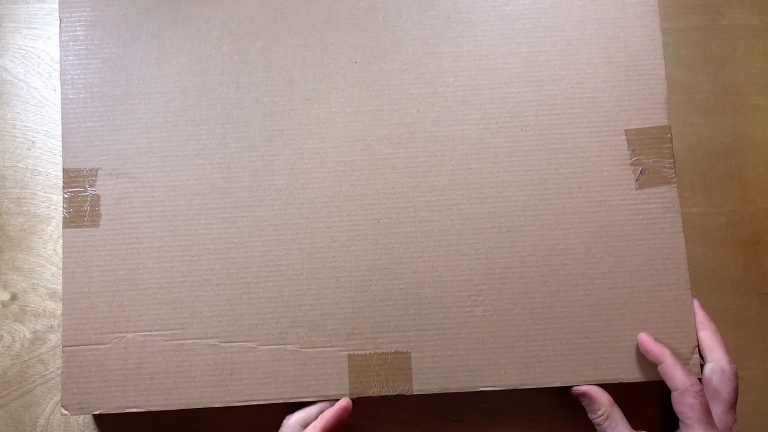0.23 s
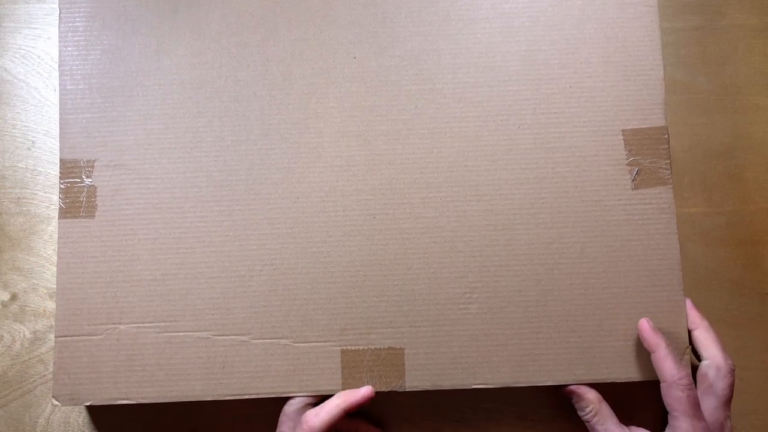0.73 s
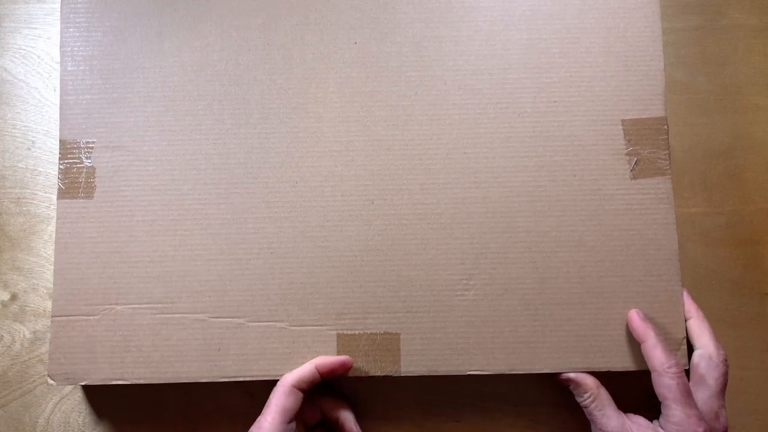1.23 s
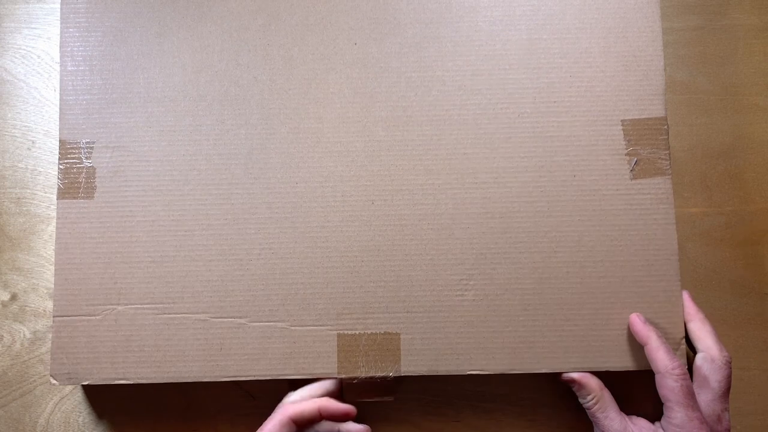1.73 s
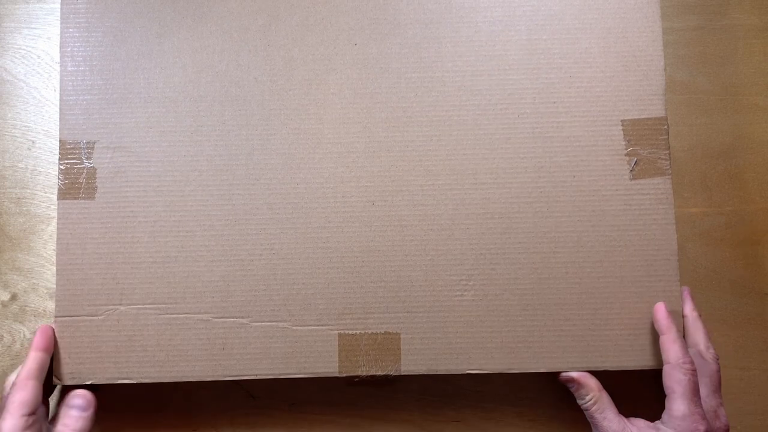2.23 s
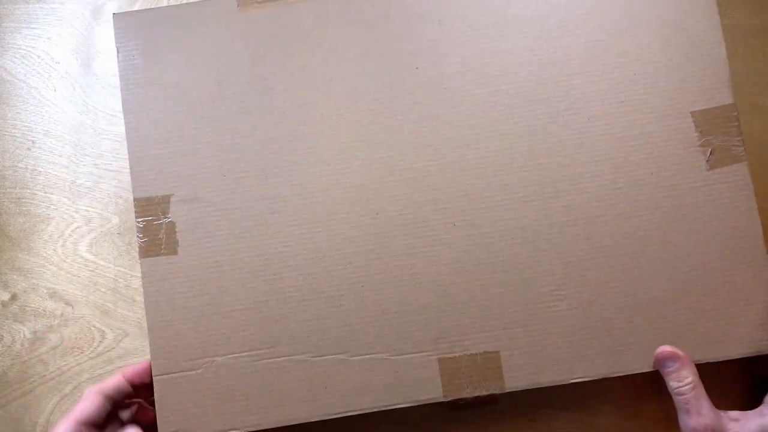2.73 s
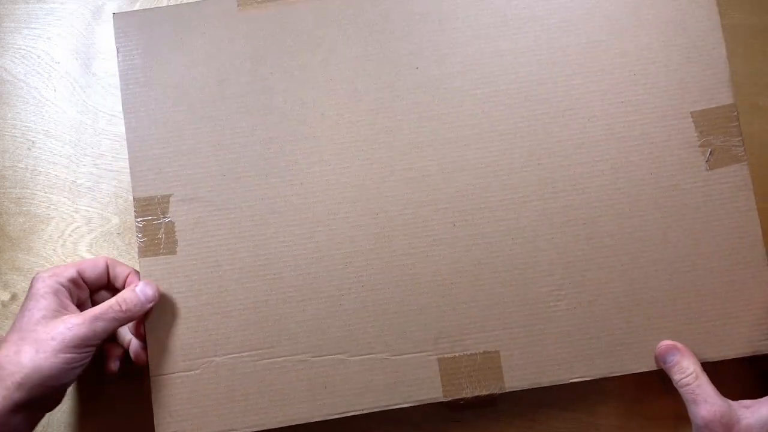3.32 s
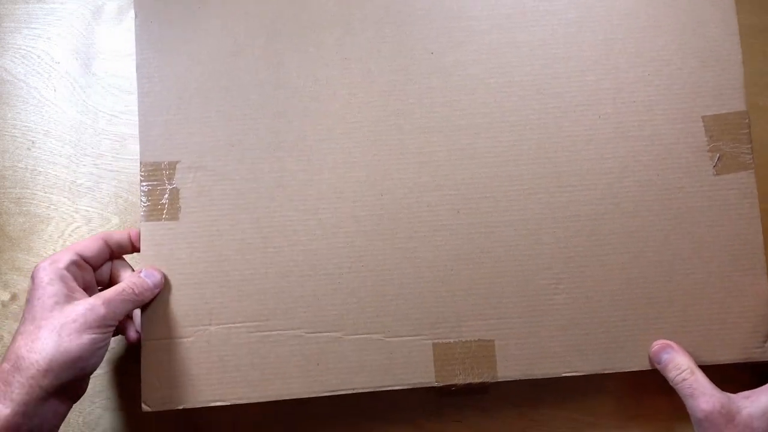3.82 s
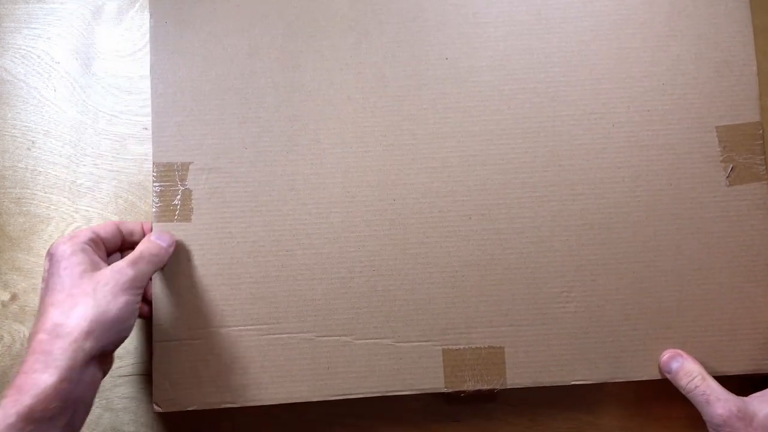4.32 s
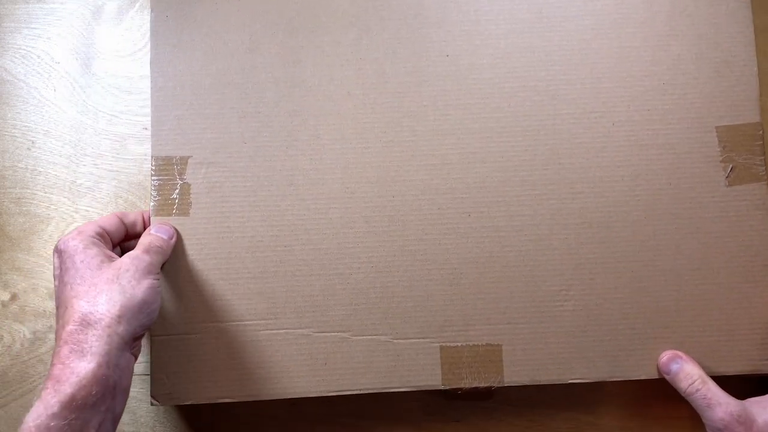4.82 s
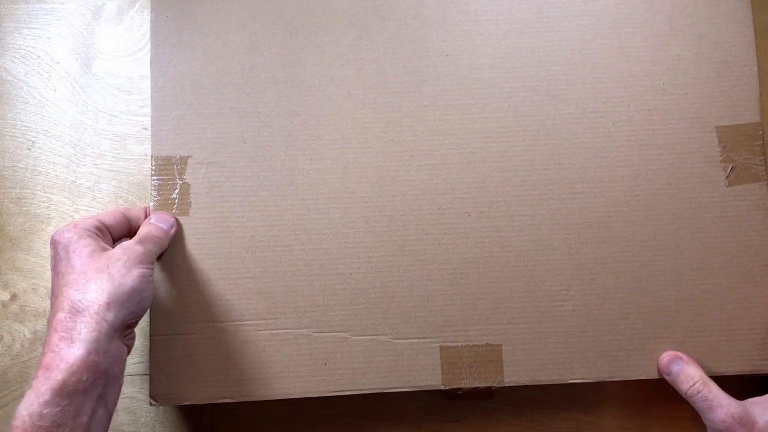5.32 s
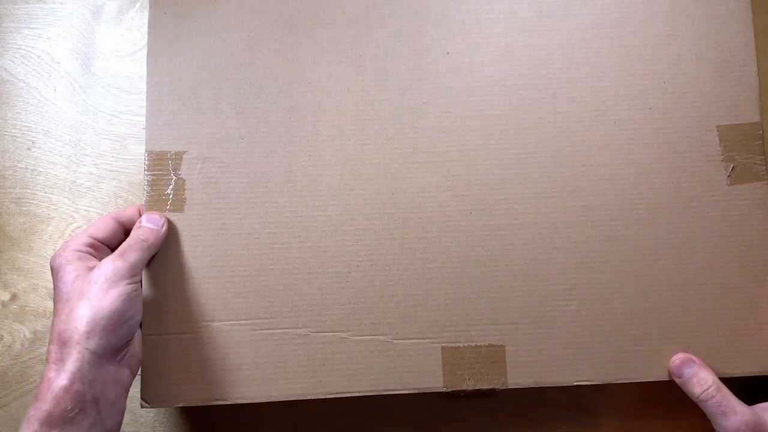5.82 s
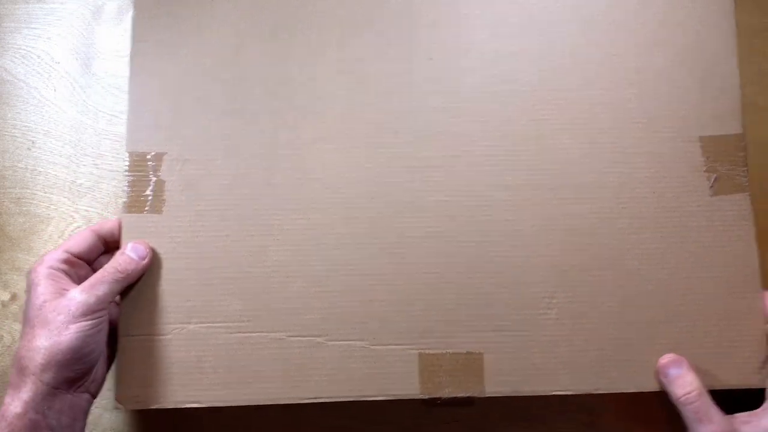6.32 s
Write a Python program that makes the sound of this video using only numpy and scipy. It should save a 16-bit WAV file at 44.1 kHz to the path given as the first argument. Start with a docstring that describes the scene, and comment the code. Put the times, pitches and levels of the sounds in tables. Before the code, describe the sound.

Hands turn a large cardboard box on a wooden table, rubbing, snapping and creaking, with one sharp knock in a quiet room.

```python
"""Hands turn a large cardboard box on a wooden table in a small, quiet room. First the board rubs and snaps
as it sticks and slips, and the front flap creaks against its tape. At 1.3 s a flap lets go with a sharp
knock. Softer rubbing and picking at the taped edge follow, with faint squeaks and fingers thumping the
panel. From 4.4 s the snaps grow louder, then the side flap creaks, and a few thumps and a last rub end it.
A soft hush and hum lie under everything."""
import sys
import numpy as np
from scipy import signal
from scipy.fft import rfft, irfft
from scipy.io import wavfile
from scipy.ndimage import uniform_filter1d

SR = 44100
rng = np.random.default_rng(int(sys.argv[2]) if len(sys.argv) > 2 else 0)


def to_wav(s):
    """Save 16-bit WAV."""
    ch = np.atleast_2d(s).T  # columns
    pcm = np.round(np.clip(ch, -1, 1) * 32767)  # PCM
    wavfile.write(sys.argv[1], SR, pcm.astype(np.int16))


N = 288855
T = np.arange(N) / SR

# how strong cracking cardboard is from bass to treble: pitch_hz, level_db
CRACK_TONE = [(59, -49), (100, -34), (1130, -15.5), (1870, -6), (2580, -6), (3250, -4), (5900, -14.5),
              (6560, -12), (7290, -14.5), (8460, -20), (16000, -55.5)]


def snaps():
    """The board sticks, then slips: a click, a tiny burst, an echo off the table and a ringing edge."""
    # one snap a row; low, high and top are set against its middle part:
    # start_s, level_db, ring_hz, low_db, high_db, high_hz, top_db
    single_snaps = [(.0074, -26, 1340, -19, -3, 5500, -19), (.0147, -27, 1370, -30, -3, 5430, -25),
                    (.0254, -26, 2570, -23, -18, 4920, -28), (.0376, -35, 1240, -18, -10, 5500, -28),
                    (.0301, -23.5, 1360, -14, -11, 4730, -22), (.0552, -24, 1820, -34, -14, 5180, -25),
                    (.098, -21.5, 2290, -7.5, -16.5, 5600, -39),
                    (.2383, -33.5, 2280, -2.5, -2.5, 4700, -20), (.424, -33.5, 1390, -9, -11.5, 4040, -25),
                    (.6818, -41, 1550, -1, -14, 4860, -31), (.7317, -40, 2050, -6, -22, 4520, -38),
                    (1.006, -47.5, 1510, 3, -14, 4500, -30), (1.041, -51, 3800, -20, 4, 7500, 2),
                    (1.052, -37.5, 3700, -25, -2, 6030, -10), (1.218, -52, 2120, -6, -27, 4270, -59),
                    (1.2322, -38.5, 2240, -18, -35, 4320, -43), (1.2526, -46, 2060, -3, -18, 4000, -25),
                    (1.533, -50, 1320, -15, 0, 4240, -28), (1.5875, -40, 1880, -29, -16, 4030, -31.5),
                    (1.6023, -48, 1430, -19, 2, 5700, -15), (1.8536, -24.5, 3280, -4.5, -23.5, 4150, -14),
                    (1.8644, -32, 2540, -28, -12.5, 7500, -30), (1.8774, -57.5, 1790, -2.5, 3, 7300, -14),
                    (2.1713, -55, 1986, -25.5, 9.5, 4800, -26), (2.184, -40.5, 2010, -4, -8.5, 4050, -36.5),
                    (2.2867, -41, 3900, -6, 12, 6860, 4.5), (2.3016, -38.5, 4250, -2, 13, 7200, 4),
                    (2.676, -35.5, 3680, -9, 9.5, 7800, -5), (2.7512, -45, 2460, -11, 8, 7000, -8),
                    (2.7724, -48, 3670, -15, 11, 6600, 4), (2.8261, -45.5, 1850, -24, 3.5, 7560, -10),
                    (2.8494, -52.5, 1840, -17.5, 7, 5000, -25), (2.9078, -40.5, 1670, -33, 4.5, 4500, -8.5),
                    (3.0767, -45.5, 3730, -7, 12, 4800, 1.5), (3.3154, -57.5, 1884, -6.5, 1.5, 7180, -25),
                    (3.3314, -61, 1333, -9.5, 4, 7230, -26.5), (3.3967, -39.5, 1760, -15.5, 2, 4330, -36),
                    (3.421, -26, 3730, -11.5, 2, 4300, -31.5), (3.5864, -50.5, 2030, -11, 8.5, 7600, -12),
                    (3.8732, -29.5, 1650, -18.5, -4, 4600, -47), (4.386, -27, 2190, -21, -15.5, 4310, -43),
                    (4.3944, -37, 2130, -22, -20, 4530, -39), (4.4087, -34.5, 1380, -5, -9, 5510, -40),
                    (4.5195, -12.5, 3380, -24, -19, 4280, -50), (4.5325, -33, 2490, -2, -19, 4230, -40),
                    (4.563, -16, 2600, -24.5, -15.5, 4300, -57), (4.5774, -30, 2470, -15, -17, 4540, -40),
                    (4.6614, -33, 1810, -19, -10, 5120, -23), (4.6666, -28, 3270, -23, -17, 4060, -33),
                    (4.6769, -25.5, 1850, -11, -17, 4000, -26), (4.6834, -25, 1870, -16.5, -22, 4070, -33),
                    (4.6984, -24.5, 1910, -15, -18, 4010, -28), (4.7122, -19.5, 3030, -14, -8.5, 4300, -33),
                    (4.7345, -19.5, 3170, -16, -12, 4300, -31), (4.8033, -17, 2000, -15, -16.5, 4180, -29),
                    (5.0835, -37, 2050, -11.5, -2, 5030, -9.5),
                    (5.3283, -21.5, 1830, -22, -26, 4060, -41.5),
                    (5.3347, -25.5, 1700, -18, -14, 5200, -37), (5.3434, -19.5, 1820, -16, -19, 5120, -45),
                    (5.365, -19.5, 1680, -30, -10, 4380, -41), (5.3685, -17.5, 3140, -26, -14, 4040, -35),
                    (5.3951, -19, 1840, -37, -16, 5090, -39), (5.41, -20, 1820, -29, -12, 4050, -43),
                    (5.433, -17.5, 1690, -17, -15, 4530, -40), (5.449, -28, 1850, -31, -21, 4010, -41),
                    (5.4608, -29, 1720, -30, -5.5, 4020, -42), (5.4724, -25, 1680, -18, -14, 4330, -39),
                    (5.5062, -25.5, 1720, -8, -11, 4230, -38), (5.5493, -27, 1690, -8, -21, 4010, -37),
                    (5.7114, -42, 1760, -18, -8, 5540, -5), (5.73, -40, 1830, -18, -6, 6000, -11),
                    (5.9546, -18.5, 1610, -14, -8.5, 4080, -30.5), (5.9878, -33, 1500, -3, -19, 4000, -44),
                    (6.2129, -40.5, 3230, -29, 8, 6200, -5)]
    rows = single_snaps + flurries()
    out, t = np.zeros(N), np.arange(2048) / SR
    lead_s = .002
    age = np.maximum(t - lead_s, 0)
    click = np.exp(-((t - .0023) / .00002) ** 2)
    fade_in = np.clip((t - .0014) / .00051, 0, 1)
    for start_s, level_db, ring_hz, low_db, high_db, high_hz, top_db in rows:
        noise = rng.standard_normal(len(t))
        decay_s = .001221 * np.exp(.2 * noise[0])
        shape = (1 - np.exp(-age / .00027)) * np.exp(-age / decay_s)
        burst = 1.5 * click + noise * shape
        echo = .37 * np.roll(burst, round(.0032 * SR))
        low, mid, high, top = board_bands(burst + echo, CRACK_TONE, ring_strength=7.5)
        high = unit_level(.45 * high + resonate(high + .32 * mid, high_hz, width_hz=1100))
        # the ring sags in pitch as the bent edge relaxes
        cycles = ring_hz * (.933 * age + .00022 * (1 - np.exp(-age / .0011)))
        ring = unit_level(shape * np.sin(2 * np.pi * cycles))
        ring_share = .55 * (ring_hz / 1800) ** -.8  # higher rings are weaker
        middle = (1 - ring_share) * mid + ring_share * ring
        snap = middle + gain(low_db) * low + gain(high_db) * high + gain(top_db) * top
        add(out, start_s - lead_s, gain(level_db) * snap * fade_in / abs(middle).max())
    return out


def flurries(count=4):
    """Makes rows for small extra snaps that come in quick bunches at chance moments."""
    # one bunch a row: start_s, length_s, level_db, ring_hz
    bunches = [(.166, .05, -36, 2100), (.25, 0.2, -35, 1900), (5.476, .2, -34, 1750),
               (5.952, 0.032, -38, 1880)]
    tone = (-17, -12, 5200, -33)  # low_db, high_db, high_hz, top_db
    rows = []
    for start_s, length_s, level_db, ring_hz in bunches:
        for k, (when, force, pitch) in enumerate(rng.random((count, 3))):
            snap_s = start_s + length_s * (k + when) / count
            rows.append((snap_s, level_db + 8 * (2 * force - 1), ring_hz * (.87 + .33 * pitch), *tone))
    return rows


def knock():
    """The tape crackles for a moment, then the flap lets go and rings very briefly."""
    # the flap's own notes: pitch_hz, level_db, fade_s (time to fall 60 dB)
    flap_notes = [(102.4, -25.5, .03), (270, -21, 0.034), (419, -21, 0.0209), (972, -31.5, 0.0032),
                  (1236, -5, 0.0084), (1416, 4, 0.011), (2293, -0.5, 0.0088), (2670, -7.5, 0.01),
                  (3390, -7, 0.012), (4070, -21, 0.015), (6150, -15, 0.012), (7270, -24, 0.0077)]
    knock_s, lead_s = 1.2937, .01
    out, t = np.zeros(N), np.arange(4096) / SR - lead_s
    age = np.maximum(t, 0)
    ring = np.zeros(len(t))
    for hz, level_db, fade_s in flap_notes:
        rise = 1 - np.exp(-(age * hz / 1.27) ** 2)  # stiff high notes speak first
        ring += gain(level_db - 60 * age / fade_s) * rise * np.sin(2 * np.pi * hz * age)
    crackle = gain(-19) * np.clip(1 + t / .0042, 0, 1) ** .5 * (t < 0)
    crack = gain(-9) * np.exp(-age / .0032) * (t > 0)
    noise = rng.standard_normal(len(t)) * (crackle + crack)
    fibres = irfft(rfft(noise) * unit_level(tone_gains(CRACK_TONE, len(t))))
    add(out, knock_s - lead_s, gain(4.5) * ring + fibres)
    return out


def rubbing():
    """Hands and table drag over paper fibres, whose countless tiny clicks blend into a scrape."""
    # how strong rubbed paper is from bass to treble: pitch_hz, level_db
    paper_tone = [(59, -52.5), (100, -21), (119, -0.5), (156, -5.5), (289, -0.5), (452, -3), (547, -4.5),
                  (950, -5), (1760, -0.5), (3050, -2.5), (5770, -7), (10200, -19.5), (16000, -45)]
    scrape, rumble, hiss, fizz, edge_hz, edge_db = hand_pressure()
    clumps = unit_level(uniform_filter1d(rng.standard_normal(N), size=250))
    noise = rng.standard_normal(N)
    click_db = 2.1 * np.minimum(rng.exponential(1, N), 4)
    fibres = noise * gain(.31 * clumps + click_db)
    low, mid, high, top = board_bands(fibres, paper_tone, ring_strength=.7)
    edge_ring = unit_level(resonate(resonate(fibres, edge_hz, 280), edge_hz, 400))
    return scrape * (mid + gain(edge_db) * edge_ring) + rumble * low + hiss * high + fizz * top


def hand_pressure():
    """Strokes swell, hold and fade. Gives four rubbing levels and the edge's ring pitch and level."""
    # strokes of hands and table on the board: full_pressure_s, rise_s, hold_s, release_s,
    # scrape_db, rumble_db, hiss_db, fizz_db, edge_hz, edge_db (set against the scrape)
    strokes = [(.012, 0.09, 0.013, 0.18, -41.5, -41.5, -56, -59, 1400, 0),
               (0.104, 0.014, 0.0085, 0.055, -38.5, -39.5, -52, -75, 1800, -14),
               (0.241, 0.29, 0.094, 0.18, -43, -47, -55, -70, 1600, -28),
               (0.466, 0.011, 0.058, 0.09, -59.5, -54.5, -72, -90, 1660, -24),
               (0.565, .05, .13, .3, -57.5, -67.5, -65.5, -79, 1950, -17),
               (0.731, 0.071, 0.058, 0.51, -57, -60, -66, -83, 2050, -7),
               (1.024, 0.37, 0.0053, 0.057, -57.5, -62.5, -62, -73, 1970, -22),
               (1.056, 0.023, .004, 0.13, -64.5, -59, -59.5, -79, 2000, -16),
               (1.288, 0.04, 0.0047, 0.012, -42, -47, -50, -71, 1790, -7),
               (1.317, 0.036, 0.023, .15, -37, -45, -42.5, -56.5, 1420, -8),
               (1.428, .06, .004, 0.21, -50, -73, -60, -74, 1290, -1),
               (1.745, 0.11, .03, .1, -55.5, -62, -64.5, -80, 1900, -11),
               (1.588, 0.071, .004, 0.034, -58.5, -63, -73, -79, 1760, -6.5),
               (1.839, 0.19, .006, 0.019, -49.5, -53, -56, -68, 2690, -4),
               (1.902, 0.046, 0.019, 0.39, -66, -59, -66, -79.5, 1700, -22),
               (2.18, 0.011, .004, 0.11, -58.5, -55, -57.5, -73, 2000, -19.5),
               (2.358, 0.18, 0.11, .3, -52, -58.5, -53.5, -66, 2015, -19),
               (2.543, 0.39, .03, 0.45, -51, -58, -56, -70, 1900, -17),
               (2.748, 0.089, 0.016, 0.33, -58.5, -59, -57.5, -69, 1850, -13),
               (2.896, .01, 0.0043, 0.29, -58, -66, -64, -74, 1810, -12),
               (3.077, 0.0053, .004, .04, -55, -63.5, -61.5, -69.5, 1510, -0.5),
               (3.13, .08, .004, 0.26, -60, -63, -65, -75.5, 1900, -4.5),
               (3.395, .01, 0.056, 0.45, -55, -60.5, -62.5, -79.5, 1700, -32),
               (3.423, .005, .03, .12, -49.5, -60, -62, -84, 2900, 1),
               (3.586, 0.22, 0.024, 0.75, -55, -60.5, -60, -72, 1900, -19),
               (3.868, .02, 0.12, 0.25, -56.5, -58, -63, -77, 1815, -17),
               (4.069, .05, .004, 0.052, -56, -62, -62, -69, 1730, -10),
               (4.106, .04, .05, .15, -55, -58.5, -58.5, -73, 1800, -11),
               (4.22, 0.095, .02, 0.43, -57.5, -64, -63.5, -81, 2147, -8),
               (4.418, 0.072, 0.01, 0.098, -46.5, -51.5, -55.5, -76, 1800, -15),
               (4.519, 0.0068, 0.0046, 0.18, -52, -51, -62, -67, 1950, -17),
               (4.707, 0.16, .004, 0.18, -48.5, -47.5, -52.5, -83, 1950, -3),
               (4.8, 0.0046, .004, 0.18, -45.5, -49.5, -52, -88, 1880, -14),
               (4.959, 0.047, 0.0048, 0.14, -51.5, -60.5, -56.5, -62.5, 1910, -18),
               (5.07, .01, .004, 0.21, -62, -56.5, -64, -73, 2000, -10),
               (5.211, 0.14, .004, 0.098, -57, -72, -58, -71, 1790, -8.5),
               (5.284, 0.027, .004, .04, -63.5, -73, -67, -70, 1675, -12),
               (5.329, 0.0075, 0.15, 0.26, -48.5, -48, -52, -76, 1810, -12),
               (5.528, 0.15, 0.074, 0.16, -38, -45, -46.5, -69, 1750, -32),
               (5.683, 0.14, 0.032, 0.058, -47, -65, -53, -57, 1790, 0),
               (5.76, .03, .004, 0.36, -56, -55.5, -58.5, -70.5, 1810, -3),
               (5.957, .004, 0.0067, .2, -42, -53.5, -47, -80, 1650, -25),
               (6.164, .04, 0.0037, 0.064, -58.5, -78, -66, -72, 2050, -10),
               (6.213, .006, 0.11, 0.53, -57.5, -60, -71, -82, 1900, -10),
               (6.461, 0.51, .2, .1, -47, -54, -50, -61, 1850, -24)]
    # hands lying on the board: scrape_db, rumble_db, hiss_db, fizz_db, edge_hz, edge_db
    resting = (-83, -68, -78, -97.5, 1799.5, -13)
    # how strongly each part follows the pressure (plain factors): scrape, rumble, hiss, fizz
    steepness = (1.004, 1.01, 1.01, 1.7)
    t = np.arange(0, T[-1] + .002, .001)
    full_s, rise_s, hold_s, release_s, *columns = np.transpose(strokes)[:, :, None]
    before = np.maximum(full_s - t, 0) / rise_s
    after = np.maximum(t - full_s - hold_s, 0) / release_s
    pressure_db = -24 * (before + after)
    powers = [np.vstack([gain(db + steep * pressure_db), np.full(len(t), gain(rest_db))]) ** 2
              for db, rest_db, steep in zip(columns, resting, steepness)]
    levels = [np.sqrt(power.sum(0)) for power in powers]
    share = powers[0] / powers[0].sum(0)  # the loudest scrape has most say in the edge's ring
    edge = [np.append(column, rest) @ share for column, rest in zip(columns[4:], resting[4:])]
    return [np.interp(T, t, curve) for curve in levels + edge]


def creaks():
    """A flap pulled against its tape slips unevenly; each slip is a puff of noise that makes it ring."""
    # one list of points for each creak: time_s, level_db, slips_per_s
    pulls = [
        [(0.0, -42, 133), (0.024, -32, 118), (0.092, -51, 154), (0.098, -41, 125), (0.12, -38, 220)],
        [(0.15, -50, 104), (0.294, -32, 127), (0.418, -69, 280), (0.42, -47, 103)],
        [(5.44, -29, 110), (5.462, -30, 143), (5.486, -36, 180), (5.554, -37.5, 130), (5.6, -40, 170)],
        [(5.605, -46, 170), (5.631, -34, 130), (5.655, -27.5, 116), (5.76, -49.5, 99)],
    ]
    # the notes each flap rings at: pitch_hz, width_hz, level_db
    front_flap = [(253, 27, -10.0), (1333, 14, 3), (1790, 28, -1.5), (2146, 24, 0.5), (2740, 43, -6),
                  (2760, 25, -12), (3160, 26, -4), (4040, 36, -5.5), (4650, 100, -10.0), (4850, 22, -5.5),
                  (4960, 37, -21), (5270, 54, -7), (5960, 130, -8.5), (6900, 52, -22), (10600, 550, -34),
                  (12900, 600, -33)]
    side_flap = [(310, 51, -12), (685, 23, -7), (1764, 85, 7), (2110, 40, -3), (2470, 26, -34),
                 (3350, 200, -3), (3940, 59, -6.5), (5040, 190, -17), (5460, 110, -13), (6060, 30, -22),
                 (6330, 75, -15), (6850, 69, -28), (8100, 49, -18), (9350, 160, -27)]
    out = np.zeros(N)
    for points, flap in zip(pulls, (front_flap, front_flap, side_flap, side_flap)):
        time_s, level_db, slips_per_s = np.transpose(points)
        t = np.arange(time_s[0], time_s[-1], 1 / SR)
        wander = unit_level(uniform_filter1d(rng.standard_normal(len(t)), size=200))
        slips = np.cumsum(np.interp(t, time_s, slips_per_s) * np.exp(.3 * wander)) / SR
        puffs = rng.standard_normal(len(t)) * (.23 + np.exp(-(slips % 1) / .088))
        # a second, wider pass keeps the gaps between the notes quiet
        ring = sum(gain(db) * resonate(resonate(puffs, hz, width + 45), hz, 2.1 * width + 300)
                   for hz, width, db in flap)
        loudness = gain(np.interp(t, time_s, level_db)) * signal.windows.tukey(len(t), .1)
        add(out, time_s[0], loudness * unit_level(ring))
    return out


def thumps():
    """A soft fingertip sets the panel swinging: a short low note with two higher ones on top."""
    # one finger tap a row: start_s, level_db, pitch_hz, fade_s (time to fall 60 dB)
    finger_taps = [(0.098, -45, 285, 0.04), (0.465, -41, 816, 0.031), (0.502, -40.5, 880, 0.043),
                   (1.737, -47, 374, 0.19), (1.854, -20, 564, 0.014), (1.871, -36, 276, 0.045),
                   (5.714, -28.5, 510, 0.024), (6.128, -26.5, 260, 0.023), (6.161, -23.5, 261, 0.036),
                   (6.312, -40, 276, 0.1)]
    out, t = np.zeros(N), np.arange(4000) / SR
    rise = 1 - np.exp(-t / .00048)
    for start_s, level_db, hz, fade_s in finger_taps:
        fall = gain(-60 * t / fade_s)
        note = np.sin(2 * np.pi * hz * t)
        overtone = .41 * fall * np.sin(2 * np.pi * 2.28 * hz * t)
        tick = .52 * fall ** 3 * np.sin(2 * np.pi * 2100 * t)
        add(out, start_s, gain(level_db) * rise * fall * (note + overtone + tick))
    return out


def squeaks():
    """Faint, thin tones that slide in pitch; the lower ones are raspier."""
    # one list of points for each squeak: time_s, pitch_hz, level_db
    slides = [
        [(0.53, 5220, -77), (0.548, 5640, -65), (0.572, 5600, -53.5), (0.59, 5850, -79)],
        [(1.93, 5199, -72), (1.948, 5400, -61), (1.972, 5516, -73), (2.02, 5449, -62.5), (2.12, 5110, -84)],
        [(1.92, 10293, -83), (1.932, 10514, -85), (2.004, 10100, -83), (2.054, 10625, -86), (2.07, 9300, -97)],
        [(4.44, 8922, -93), (4.442, 8850, -86), (4.584, 9000, -71), (4.622, 9500, -72), (4.64, 9601, -87)],
    ]
    out = np.zeros(N)
    for points in slides:
        time_s, pitch_hz, level_db = np.transpose(points)
        t = np.arange(time_s[0], time_s[-1], 1 / SR)
        slide_hz = np.interp(t, time_s, pitch_hz)
        tone = np.sin(2 * np.pi * np.cumsum(slide_hz) / SR)
        rasp = unit_level(resonate(rng.standard_normal(len(t)), slide_hz, width_hz=300))
        rasp *= .79 * (5500 / pitch_hz.mean()) ** 3
        loudness = gain(np.interp(t, time_s, level_db)) * signal.windows.tukey(len(t), .3)
        add(out, time_s[0], loudness * unit_level(tone + rasp))
    return out


def board_bands(sound, tone, ring_strength):
    """The board boosts its own notes. Gives low, middle, high and top parts of equal power."""
    # the notes the board rings at: pitch_hz, width_hz, level_db
    board_notes = [(244, 120, -3.5), (710, 140, -9.5), (1670, 1300, -7), (2340, 160, -6), (2930, 32, -0.5),
                   (3320, 120, -4.5), (4363, 77, -1.5), (5840, 330, -6.5), (5880, 20, -11.5),
                   (7290, 69, -24.5)]
    hz = np.fft.rfftfreq(len(sound), 1 / SR)
    above = [1 / (1 + (split_hz / (hz + 1)) ** 8) for split_hz in (1050, 4250, 8750)]
    boost = sum(gain(db) / (1 + (2 * (hz - pitch) / width) ** 2) for pitch, width, db in board_notes)
    boost *= 1 + .97 * (1 - above[0])  # the wide panel rings more clearly than the edges
    spectrum = rfft(sound) * tone_gains(tone, len(sound)) * np.sqrt(1 + ring_strength * boost)
    bands = -np.diff([np.ones_like(hz), *above, np.zeros_like(hz)], axis=0)
    return [unit_level(irfft(spectrum * band, len(sound))) for band in bands]


def room_echo(sound):
    """The walls send back many small echoes, each pitch dying at its own speed."""
    # how long the room rings: pitch_hz, fade_s (time to fall 60 dB)
    fade_times = [(200, 0.24), (530, 0.26), (1390, 0.38), (3680, 0.17), (9700, 0.27)]
    out, slots = np.zeros(N), np.arange(220, SR // 2 - 20, 20)
    build_up = 1 - .2 * np.exp(-slots / 680)
    for k in range(3):
        echoes = np.zeros(SR // 2)
        echoes[slots + rng.integers(0, 20, len(slots))] = rng.choice([-1., 1.], len(slots)) * build_up
        hz, t, spectrum = signal.stft(echoes, SR, nperseg=256)
        fade_db = -60 * t / value_at(fade_times, hz)[:, None]
        dull_db = -2.5 * (hz[:, None] / 10000) ** 2
        tail = signal.istft(spectrum * gain(fade_db + dull_db), SR, nperseg=256)[1]
        turn = np.sqrt(2 / 3) * np.cos(2 * np.pi * (7 * T + k / 3))  # three tails take turns
        out += signal.fftconvolve(sound * turn, tail / np.linalg.norm(tail))[:N]
    return out


def room_tone():
    """A steady hush with a low, wavering hum."""
    # how strong the hush is from bass to treble: pitch_hz, level_db
    hush_tone = [(12, -45), (20, -8), (65, 5.5), (107, 5.5), (172, 5), (472, -18.5), (558, -11.5),
                 (1120, -7), (1910, 3.5), (2750, -5), (5850, -11), (10200, -19.5), (16000, -57)]
    # the notes of the hum: pitch_hz, level_db
    hum_notes = [(123.8, -69), (183.0, -69)]
    hush = unit_level(irfft(rfft(rng.standard_normal(N)) * tone_gains(hush_tone, N), N))
    hum = sum(gain(db) * unit_level(resonate(rng.standard_normal(N), hz, 7.9)) for hz, db in hum_notes)
    return gain(-67) * hush + hum


def resonate(sound, pitch_hz, width_hz):
    """Keeps what lies near a pitch: shifts that pitch down to zero, smooths, and shifts back."""
    spin = np.exp(2j * np.pi * np.cumsum(pitch_hz * np.ones(len(sound))) / SR)
    memory = np.exp(-np.pi * width_hz / SR)
    return 2 * (spin * signal.lfilter([1 - memory], [1, -memory], sound / spin)).real


def gain(db):
    """Turns decibels into a number to multiply by."""
    return 10 ** (np.asarray(db) / 20)


def unit_level(sound):
    """Scales a sound to an average power of 1."""
    return sound / np.sqrt(np.mean(sound ** 2) + 1e-20)


def value_at(points, hz):
    """Reads between the rows of a table of pitches and values."""
    pitch_hz, value = np.transpose(points)
    return np.interp(np.log(hz + 1), np.log(pitch_hz + 1), value)


def tone_gains(tone, length):
    """Turns a bass-to-treble table into a gain for each pitch in a sound of this length."""
    return gain(value_at(tone, np.fft.rfftfreq(length, 1 / SR)))


def add(mix, start_s, sound):
    """Mixes a sound in at its start time."""
    part = mix[round(start_s * SR):][:len(sound)]
    part += sound[:len(part)]


def scene():
    """Mixes the box, its echo and the room's hush into one channel."""
    snap, flap = snaps(), knock()
    rub = rubbing() + squeaks() + creaks()
    thump = thumps()
    echo = room_echo(gain(-9.5) * snap + gain(-12.5) * flap + gain(-12) * rub + gain(-13.5) * thump)
    # the box sounds carry little deep bass below about 95 Hz
    bass_cut = signal.butter(3, 95, "highpass", fs=SR, output="sos")
    box = signal.sosfilt(bass_cut, snap + flap + rub + thump + echo)
    return (box + room_tone())[None]


def record(dry):
    """Flattens the knock's too-loud peaks, then cuts the treble above 16.2 kHz."""
    clipped = np.clip(dry, -1, 1)
    treble_cut = signal.firwin(511, 16200, window=("kaiser", 9), fs=SR)
    return signal.oaconvolve(clipped, treble_cut[None], "same")


dry = scene()
out = record(dry)
to_wav(out)
```